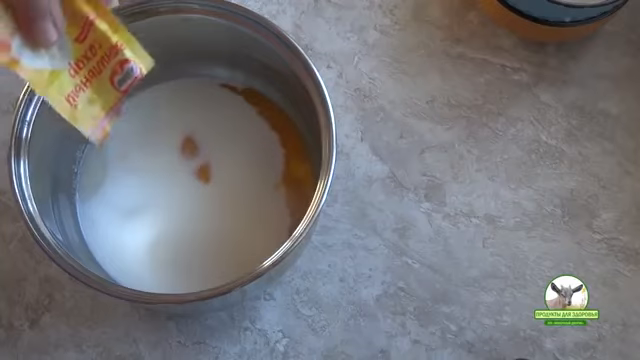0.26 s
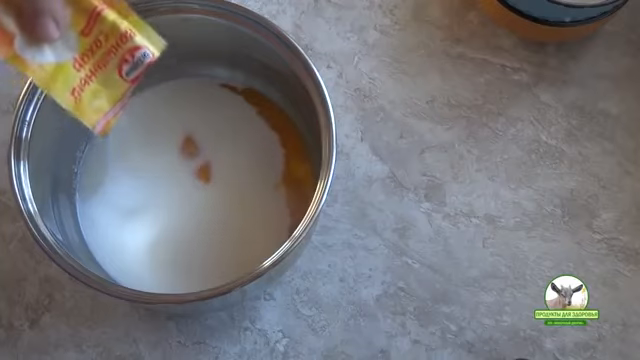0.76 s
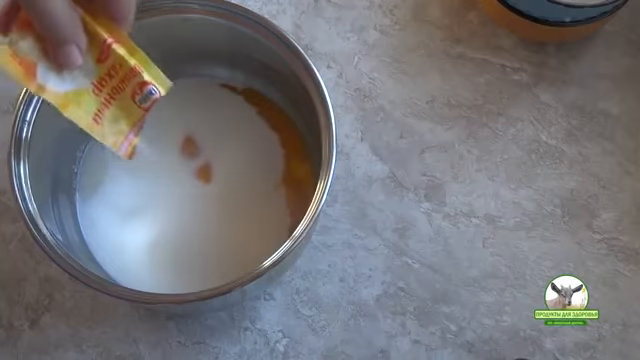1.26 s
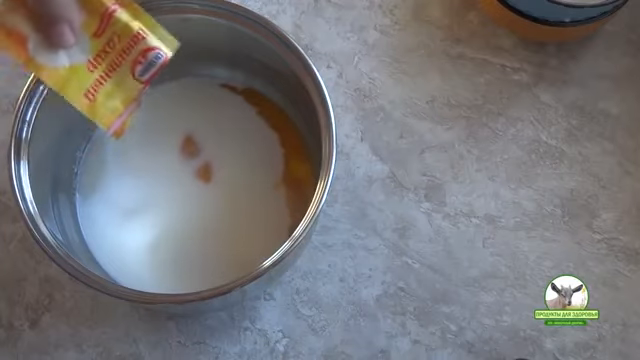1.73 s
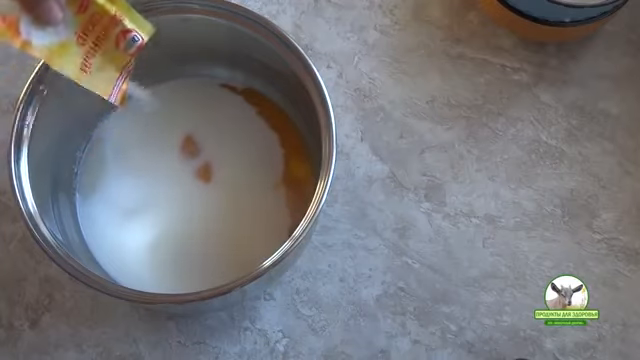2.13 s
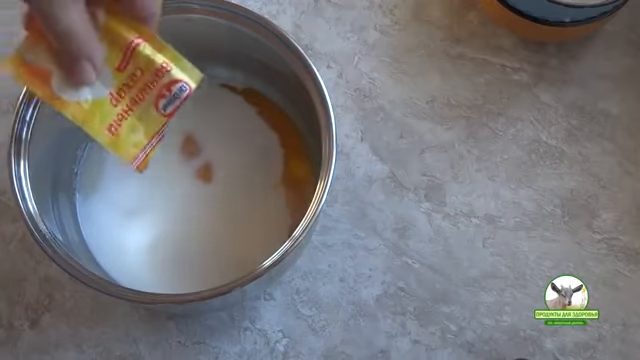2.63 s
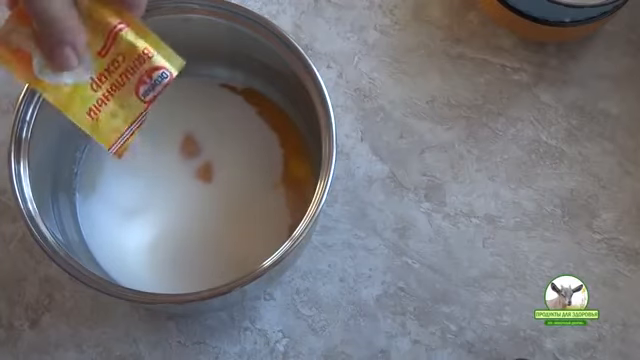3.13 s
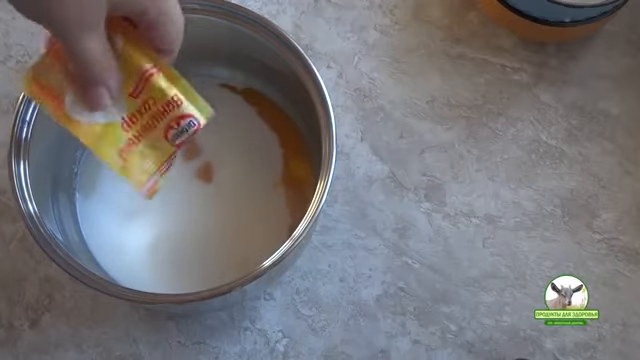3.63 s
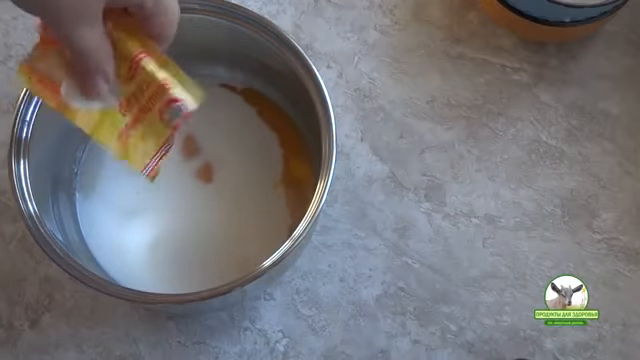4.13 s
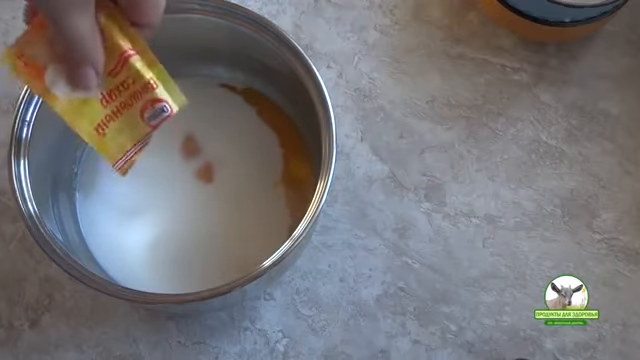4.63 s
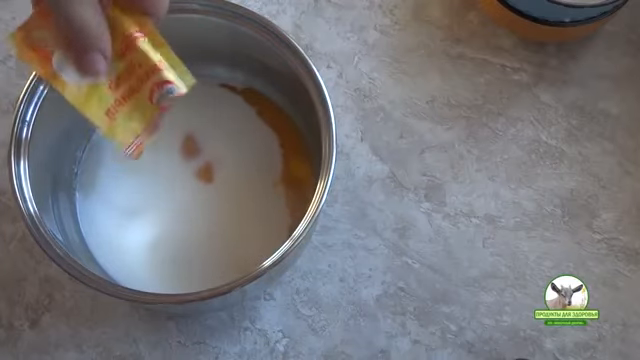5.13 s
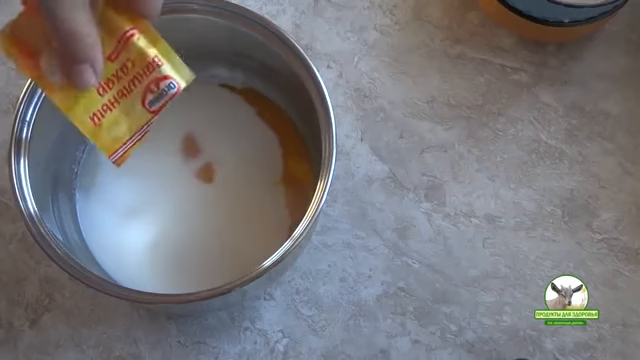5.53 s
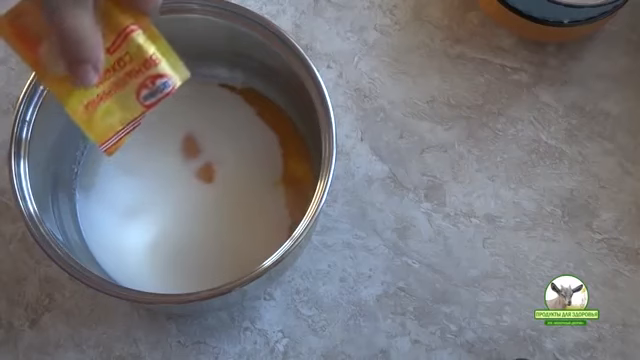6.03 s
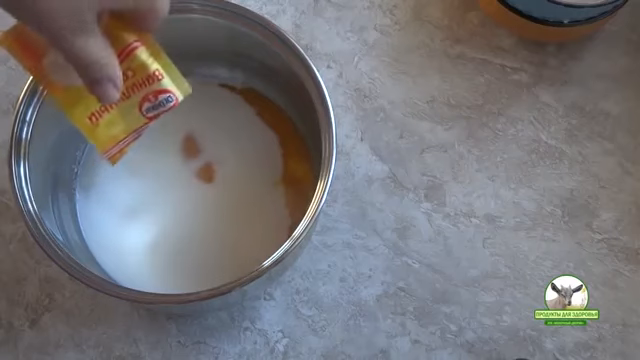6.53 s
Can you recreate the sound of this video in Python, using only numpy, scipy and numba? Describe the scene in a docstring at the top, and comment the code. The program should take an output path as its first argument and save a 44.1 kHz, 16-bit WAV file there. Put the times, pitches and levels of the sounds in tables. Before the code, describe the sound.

A small paper packet is shaken and squeezed over a metal pan in a small kitchen, heard very near. First come swishing, sandy hisses with scattered paper ticks; then rapid crinkling jerks and hard snaps dominate, peaking just after five seconds. It falls away to a few faint slides of sugar. Muffled grains patter below, handling thuds are barely audible, and a low-level appliance whir continues.

```python
"""Sugar sachet over a pan

A paper sachet of fine sugar is shaken and squeezed over a steel pan of milk, close to the microphone.
Sliding sugar hisses as dense filtered impulses; bent paper crackles as short damped vibrations and its
creases snap as brief runs of slips. Landing grains patter as sparser filtered impulses, and handling thuds.
Resonators ring the hollow pan, noise tails the small kitchen; filtered noise and sines whir throughout."""
import sys
import numpy as np
from scipy import signal
from scipy.fft import rfft, irfft
from scipy.io import wavfile
from scipy.ndimage import uniform_filter1d
from numba import njit

SR = 44100
rng = np.random.default_rng(int(sys.argv[2]) if len(sys.argv) > 2 else 0)


def digitize_waveform(pressure):
    """Quantize a signal to 16-bit integers and store it at the path in sys.argv[1].

    Rows of a 2-D input are taken as channels; values are limited to [-1, 1].
    """
    field = np.atleast_2d(pressure).T
    bounded = np.clip(field, -1, 1)
    quanta = np.round(bounded * 32767).astype(np.int16)
    wavfile.write(sys.argv[1], SR, quanta)


N = 298557
TIME = np.arange(N) / SR
TOP_HZ = 15100  # upper limit of the paper's pitches and of the whole sound


def undb(db):
    """Level to amplitude: 20 dB is a factor of ten."""
    return 10 ** (np.asarray(db) / 20)


def unit(x):
    """Normalization of mean power: scale to rms 1."""
    return x / np.sqrt(np.mean(x ** 2))


def colour(x, points):
    """Minimum-phase filtering through (f/Hz, level/dB) points; white noise keeps its power."""
    size = 4096
    hz, db = np.transpose(points)
    freqs = np.maximum(np.fft.rfftfreq(size, 1 / SR), 1)
    gain = undb(np.interp(np.log(freqs), np.log(hz), db))
    # folding the cepstrum onto positive time makes the filter causal
    cepstrum = irfft(np.log(gain))
    cepstrum[1:size // 2] *= 2
    cepstrum[size // 2 + 1:] = 0
    response = irfft(np.exp(rfft(cepstrum)))
    return signal.fftconvolve(x, response / np.linalg.norm(response))[:len(x)]


def resonance(x, hz, width_hz):
    """Simple resonance: a two-pole band-pass with gain 1 at the centre."""
    top = .4 * SR
    centre = min(hz, top)
    quality = centre / min(width_hz, top)
    b, a = signal.iirpeak(centre, quality, fs=SR)
    return signal.lfilter(b, a, x)


def walk(rate):
    """Slow random modulation: smoothed chance of spread near 1, with rate new values a second."""
    k = int(SR / rate)
    steps = np.repeat(rng.standard_normal(N // k + 1), k)
    return 1.2 * uniform_filter1d(steps, k)[:N]


def add(out, s, sound):
    """Superposition: mix a short sound in at time s."""
    i = int(np.clip(s * SR, 0, N - 1))
    out[i:i + len(sound)] += sound[:N - i]


def stereo(mid, side):
    """Sum and difference: left and right from mid and side."""
    return np.array([mid + side, mid - side])


def clicks(rate, spread_db):
    """Random impulse train: rate a second on average, of uneven size and either sign."""
    chance, size, sign = rng.random((3, N))
    return (chance < rate / SR) * undb(spread_db * size ** 2) * np.sign(sign - .5)


@njit
def ring(kicks, hz, cycles):
    """Damped free vibration: each kick rings at its own pitch; equal kicks carry equal energy."""
    out = np.zeros(len(kicks))
    for i in np.nonzero(kicks)[0]:
        life = cycles * SR / hz[i]  # samples in which the amplitude falls to 1/e
        z = kicks[i] / np.sqrt(life) + 0j
        turn = np.exp(2j * np.pi * hz[i] / SR - 1 / life)
        for j in range(i, min(i + int(6 * life), len(out))):
            out[j] += z.imag
            z *= turn
    return out


# spectrum of the whir: (f/Hz, relative level/dB)
WHIR_SPECTRUM = [(30, -26), (130, -29), (270, -11.5), (430, -14), (520, -9), (700, -15), (850, -8.5),
                 (1080, -12), (1330, 4), (1450, 1), (1700, -2), (1900, -13.5), (3000, -10.5),
                 (12000, -42.5)]
# stereo width of the whir against frequency: (f/Hz, relative side level/dB)
WHIR_WIDTH = [(60, -2.5), (200, -15), (700, -0.5), (1300, -7.5), (2400, -2.5), (4400, -26), (8000, -12),
              (15000, -18)]
# steady tones of the appliance: (f/Hz, level/dB against the whir)
HUM_TONES = [(48.4, -41), (92, -37.5), (156.1, -29.5), (942, -20.5)]
# level of whir and tones: (t/s, level/dB)
WHIR_LEVEL = [(0, -45), (1.5, -45), (3.0, -42.5), (3.7, -44), (3.9, -48), (5.3, -47.5), (5.9, -48.5),
              (6.77, -47)]


def appliance(width_db=-4, waver_db=2.5):
    """Broadband noise plus tones: a fan-like whir with hum lines that waver in level and pitch."""
    mid = colour(rng.standard_normal(N), WHIR_SPECTRUM)
    # independent noise at the sides widens the whir
    side_noise = colour(rng.standard_normal(N), WHIR_SPECTRUM)
    side = undb(width_db) * unit(colour(side_noise, WHIR_WIDTH))
    hum = np.zeros(N)
    for hz, db in HUM_TONES:
        amplitude = np.sqrt(2) * undb(db + waver_db * walk(6.9))
        cycles = np.cumsum(hz + 1.53 * walk(8)) / SR
        hum += amplitude * np.sin(2 * np.pi * cycles)
    level_db = np.interp(TIME, *np.transpose(WHIR_LEVEL)) + 1.0 * walk(9.5)
    return stereo(mid + hum, side) * undb(level_db)


# sugar slides along the tilted sachet: (start t/s, length t/s, level/dB)
SLIDES = [(-0.059, 0.23, -28), (0.252, 0.22, -37.5), (0.576, 0.3, -30.5), (0.934, 0.05, -35),
          (1.032, 0.27, -28), (1.496, 0.051, -28.5), (1.586, 0.26, -34.5), (1.891, 0.25, -31.5),
          (2.269, 0.23, -35.5), (2.583, 0.07, -43.5), (3.059, 0.25, -36), (5.743, 0.36, -52.5),
          (6.169, 0.14, -41.5), (6.34, 0.27, -36.5)]
# the fingers squeeze and jerk the sachet:
# (start t/s, length t/s, level/dB, share of paper crackle against sugar 0-1)
SQUEEZES = [(0.353, 0.13, -33, 0.24), (0.467, 0.028, -25, 0.46), (0.586, 0.15, -36.5, 1),
            (1.236, 0.092, -29, 0.38), (1.551, 0.071, -36.0, 0.67), (2.097, 0.071, -28.0, 0.23),
            (2.297, 0.038, -33, 0.4), (2.726, 0.063, -36, 0.1), (2.815, 0.081, -24, 0.23),
            (2.934, 0.075, -32, 0.27), (3.078, 0.049, -33, 0.81), (3.321, 0.047, -24, 0.55),
            (3.473, 0.045, -26.5, 0.74), (3.586, 0.14, -39.5, 0.3), (3.7, 0.064, -31.0, 0.63),
            (3.805, 0.047, -29.5, 0.1), (3.883, 0.034, -36.5, 0.16), (4.035, 0.11, -35, 0.4),
            (4.197, 0.097, -27.0, 0.47), (4.388, 0.07, -22.5, 0.37), (4.546, 0.073, -34.0, 0.1),
            (4.594, 0.05, -24.5, 0.77), (4.758, 0.095, -25.0, 0.25), (4.947, 0.041, -31.5, 0.55),
            (5.014, 0.13, -28.5, 0.42), (5.2, 0.021, -18.5, 0.46), (5.38, 0.099, -33.5, 0.68)]
SLIDE_ATTACK_S, SLIDE_RELEASE_DB_PER_S = 0.053, 86
SQUEEZE_ATTACK_S, SQUEEZE_RELEASE_DB_PER_S = 0.04, 187
SLIDE_PAPER_SHARE = 0.031  # power of a slide that also bends the paper
TRICKLE_DB = -55.5  # a few grains keep moving between the slides


def stroke(start_s, length_s, attack_s, release_db_per_s):
    """Linear attack and exponential release: one movement rises, holds to its length, then dies away."""
    t = TIME - start_s
    return np.clip(t / attack_s, 0, 1) * undb(-release_db_per_s * np.maximum(t - length_s, 0))


def hand(surge_db=1.5, jerk_db=1.47):
    """Power addition of unsteady movements: gains of sliding sugar, shaken sugar and bending paper."""
    slides = [undb(db) * stroke(s, length, SLIDE_ATTACK_S, SLIDE_RELEASE_DB_PER_S)
              for s, length, db in SLIDES]
    squeezes = [undb(db) * stroke(s, length, SQUEEZE_ATTACK_S, SQUEEZE_RELEASE_DB_PER_S)
                for s, length, db, _ in SQUEEZES]
    paper_share = np.clip(np.array(SQUEEZES)[:, 3], 0, 1)
    slide_power = np.square(slides).sum(axis=0) + undb(TRICKLE_DB) ** 2
    sliding = slide_power * undb(surge_db * walk(22)) ** 2
    squeezing = np.square(squeezes) * undb(jerk_db * walk(45)) ** 2
    shaken = (1 - paper_share) @ squeezing
    bending = paper_share @ squeezing + SLIDE_PAPER_SHARE * sliding
    return np.sqrt([sliding, shaken, bending])


# spectrum of grains ticking on paper: (f/Hz, relative level/dB)
SUGAR_SPECTRUM = [(150, -28.5), (500, -35), (1000, -27), (2000, -22), (3200, -5.5), (4900, -1.5),
                  (5600, 0.5), (7500, 1), (9000, -1.5), (15000, -3)]


def sugar():
    """Shot noise: thousands of crystals a second tick along the paper, in small surges."""
    grains = clicks(rate=14000, spread_db=10) * undb(.8 * walk(70))
    return unit(colour(grains, SUGAR_SPECTRUM))


MOUTH_HZ, MOUTH_WIDTH_HZ, MOUTH_DB = 5800, 820, -13  # MOUTH_DB holds at the start
EMPTYING_DB_PER_S = 1.4  # the mouth rings more freely as the sachet empties


def mouth(x):
    """Cavity resonance: the open end of the emptying sachet rings ever more strongly in the hiss."""
    ring_gain = undb(MOUTH_DB + EMPTYING_DB_PER_S * TIME)
    ringing = x + ring_gain * resonance(x, MOUTH_HZ, MOUTH_WIDTH_HZ)
    # divide by the rms over one second, so the tone grows but the loudness does not
    return ringing / np.sqrt(uniform_filter1d(ringing ** 2, SR))


# spectrum of sound radiated by the paper: (f/Hz, relative level/dB)
PAPER_SPECTRUM = [(100, -44), (280, -17.5), (600, -11), (1000, -8.5), (1800, -5.5), (2400, 0.5),
                  (4500, 2.5), (7500, 0.5), (10000, 0), (15000, 2)]


def crackle():
    """Buckling: tiny facets ring in clusters; pitch wanders as other patches take the strain."""
    pitch = (1300 + 13000 * rng.random(N) ** 1.3) * 2 ** (.25 * walk(45))
    facets = ring(clicks(rate=1200, spread_db=20.5), np.minimum(pitch, TOP_HZ), 1.06)
    fibres = clicks(rate=4000, spread_db=9.0)
    paper = colour(unit(facets) + undb(-1.0) * unit(fibres), PAPER_SPECTRUM)
    return unit(paper * undb(3.14 * walk(130)))


# big creases that snap through: (t/s, level/dB before SNAP_DB, centre f/Hz, snaps in the run)
BIG_CREASES = [(.152, -17, 10600, 1), (.379, -12, 5770, 1), (.3935, -16.5, 6400, 1),
               (.4946, -6.5, 11000, 2), (.6054, -17, 10000, 1), (1.267, -7, 6000, 1),
               (1.3026, -15, 4100, 1), (1.3095, -5, 12000, 2), (2.1568, -5.5, 5600, 1),
               (2.2097, -8.5, 11300, 2), (2.7712, -19, 4940, 1), (2.8437, -9, 8800, 1),
               (2.8982, -11, 5300, 1), (3.005, -7.5, 7800, 2), (3.225, -17.5, 4970, 1),
               (3.3912, -15, 2800, 1), (3.4398, -17, 4200, 1), (3.5647, -10, 4400, 1), (3.626, -6, 6450, 1),
               (3.7332, -15, 5600, 1), (3.7604, -9.5, 8400, 1), (3.7714, -5.5, 7400, 1),
               (4.0041, -19, 10400, 1), (4.0367, -18, 4350, 2), (4.0941, -15.5, 5470, 1),
               (4.1397, -14.5, 3520, 1), (4.2283, -8, 6000, 1), (4.2374, -3.5, 7600, 2),
               (4.2886, -10.5, 2420, 1), (4.3945, -15, 11000, 2), (4.4371, -10.5, 5900, 1),
               (4.4488, -4.5, 2540, 1), (4.4736, -6, 8100, 1), (4.612, -9.5, 6300, 1),
               (4.6408, -9, 3500, 2), (4.6444, -2.5, 7500, 1), (4.6685, -10, 5850, 1),
               (4.7902, -10.5, 6040, 2), (4.8362, -5.5, 8000, 1), (5.0095, -15.5, 5900, 1),
               (5.0511, -14.5, 5900, 1), (5.1431, -14, 5300, 1), (5.1672, -11, 7050, 1),
               (5.2166, -6.5, 5300, 1), (5.2262, -6, 7760, 2), (5.4212, -13.5, 3270, 1)]
RUN_GAP_S, RUN_FADE_DB = .006, 1.5  # from one snap of a run to the next
# small creases; their level is given against the bending gain
CREASES_PER_S, CREASE_DB, CREASE_SCATTER_DB = 16, 12, 1.5
CREASE_HZ, CREASE_SCATTER_OCTAVES = 7000, 0.48
SNAP_DB, SLIP_S = -2.5, 0.00083  # level offset of all snaps; time scale of the first run of slips


def creases(bend):
    """Random failure under strain: snaps as (s, dB, Hz), small ones as strong as the paper is bent."""
    events = []
    for s, db, hz, count in BIG_CREASES:
        for k in range(round(count)):
            events.append((s + k * RUN_GAP_S, db - k * RUN_FADE_DB, hz))
    chance = rng.standard_normal(size=(200, 4))
    # half the sum of two squared normals is an exponential waiting time
    waits = (chance[:, 0] ** 2 + chance[:, 1] ** 2) / 2 / CREASES_PER_S
    for s, (size, pitch) in zip(np.cumsum(waits), chance[:, 2:]):
        if s < TIME[-1]:
            bend_db = 20 * np.log10(bend[int(s * SR)])
            hz = CREASE_HZ * 2 ** (CREASE_SCATTER_OCTAVES * pitch)
            events.append((s, bend_db + CREASE_DB + CREASE_SCATTER_DB * size, hz))
    return events


def snaps(rows, width=1.0, crack_db=-5, crack_slope=0.18, stutter_db=-12, stutter_s=0.0041):
    """Snap-through instability: a crease slips for about 1 ms, stutters on and rings its patch of paper."""
    out, t = np.zeros(N), TIME[:SR // 40]
    for s, db, hz in rows:
        run = rng.choice([-1., 1.], len(t)) * np.exp(-(t / SLIP_S) ** 2 / 2)
        stutter = unit(rng.standard_normal(len(t)) ** 3) * np.exp(-t / stutter_s)
        slips = run + undb(stutter_db) * stutter
        patch = resonance(resonance(slips, hz, width * hz), hz, width * hz)
        # light snaps sound mostly their own patch; hard ones crack over the whole range
        burst = colour(patch + undb(crack_db + crack_slope * db) * slips, PAPER_SPECTRUM)
        burst *= np.sqrt(SLIP_S * SR / 2) / np.linalg.norm(burst)  # equal energy before the level
        add(out, s, undb(db + SNAP_DB) * burst)
    return out


# soft bumps of handling: (t/s of the envelope's peak, level/dB of the thud)
BUMPS = [(0.331, -57), (.39, -63.5), (2.79, -67), (3.37, -68), (6.03, -62)]


def bumps(hz=92, width_hz=50, rise_s=0.028, body_db=-1, body_hz=280):
    """Resonance under a soft push: handling gives a few low thuds with a hollow body."""
    out, t = np.zeros(N), TIME[:SR // 4]
    envelope = t / rise_s * np.exp(1 - t / rise_s)
    for s, db in BUMPS:
        push = rng.standard_normal(len(t))
        thud = unit(resonance(resonance(push, hz, width_hz), hz, width_hz))
        body = unit(resonance(resonance(push, body_hz, body_hz / 2), body_hz, body_hz / 2))
        add(out, s - rise_s, undb(db) * (thud + undb(body_db) * body) * envelope)
    return out


# spectrum of grains landing in the milk: (f/Hz, relative level/dB)
PATTER_SPECTRUM = [(100, -29), (280, -8), (420, -8), (520, 4.5), (610, 2.5), (740, -10.5), (1000, -9),
                   (1400, -0.5), (2000, -15), (8000, -28)]
# level of the landing sugar: (t/s, level/dB)
POUR_LEVEL = [(.35, -74), (.5, -51.5), (.8, -47), (1.0, -57.5), (1.3, -50), (1.5, -60), (1.9, -70),
              (2.2, -54.5), (2.7, -71), (2.9, -54), (3.55, -50), (4.1, -75), (4.45, -58), (4.9, -51),
              (5.3, -60), (6.2, -56.5), (6.77, -85)]


def patter():
    """Sparse shot noise: falling grains land in the milk, a soft, hollow rustle from the pan's bottom."""
    landings = unit(colour(clicks(rate=1200, spread_db=6.5), PATTER_SPECTRUM))
    return landings * undb(np.interp(TIME, *np.transpose(POUR_LEVEL)))


# resonances of the hollow pan: (f/Hz, width f/Hz, level/dB against the direct sound)
PAN_MODES = [(530.6, 19.5, 10.5), (652, 105, 7), (1388, 173, 5.5), (2300, 410, -1.5), (3700, 160, -17),
             (4590, 120, -10.5), (5520, 250, -15.5)]


def pan(x):
    """Sympathetic resonance: the air and the wall of the pan ring along with the sachet."""
    return x + sum(undb(db) * resonance(x, hz, width) for hz, width, db in PAN_MODES)


def kitchen(x, near_db=-8, near_t60=0.023, room_db=-9, room_t60=0.13, side_db=-2, side_hz=900,
            treble_side_db=-15):
    """Reverberation: quick reflections from the pan and the worktop, then the short tail of the room."""
    t = TIME[:SR // 3]

    def echoes(delay_s, t60, count=4):
        """Exponential decay of dense reflections; their pattern shifts as the sachet moves."""
        tails = rng.standard_normal((count, len(t))) * (t > delay_s) * undb(-60 * t / t60)
        # the sound is shared among the tails in slowly changing parts of constant total power
        shares = np.array([walk(9) for _ in tails])
        shares /= np.linalg.norm(shares, axis=0)
        return sum(signal.oaconvolve(x * share, tail / np.linalg.norm(tail))[:N]
                   for share, tail in zip(shares, tails))

    mid = x + undb(near_db) * echoes(0.0013, near_t60) + undb(room_db) * echoes(0.0032, room_t60)
    # the side signal is mostly low-passed tail, with weaker treble
    tail = echoes(0.0018, room_t60, count=2)
    low_pass = signal.butter(1, side_hz, fs=SR, output="sos")
    side = signal.sosfilt(low_pass, tail) + undb(treble_side_db) * tail
    return stereo(mid, undb(room_db + side_db) * side)


def scene(slide_db=-0.02, shaken_db=-0.2, paper_db=0.85, snap_side_db=-14):
    """Superposition: the hand moves sugar and bends paper; creases snap with a slightly uneven stereo width."""
    sliding, shaken, bend = hand()
    cracks = snaps(creases(bend))
    grains = undb(slide_db) * sliding * mouth(sugar()) + undb(shaken_db) * shaken * sugar()
    sachet = grains + undb(paper_db) * bend * crackle() + cracks
    snap_width = stereo(0, undb(snap_side_db) * walk(150) * cracks)
    return kitchen(pan(sachet) + patter()) + snap_width + bumps() + appliance()


def record(dry):
    """Saturation and band limiting: round the highest peaks and cut the top of the treble."""
    ceiling = .9
    rounded = dry / (1 + (dry / ceiling) ** 4) ** .25
    low_pass = signal.ellip(10, .2, 75, TOP_HZ, fs=SR, output="sos")
    return signal.sosfilt(low_pass, rounded)


dry = scene()
out = record(dry)
digitize_waveform(out)
```